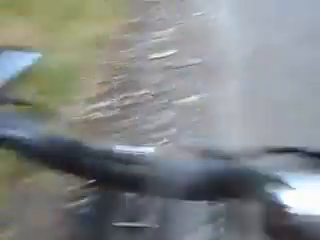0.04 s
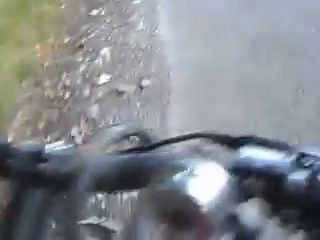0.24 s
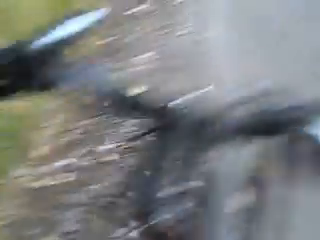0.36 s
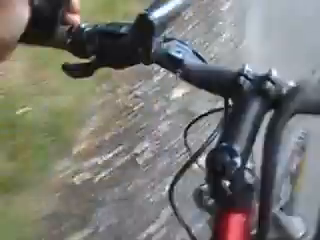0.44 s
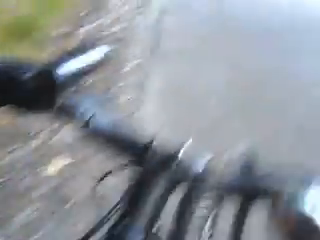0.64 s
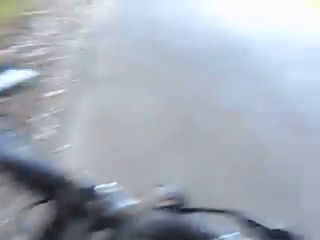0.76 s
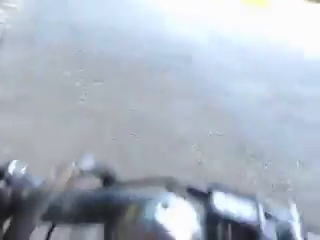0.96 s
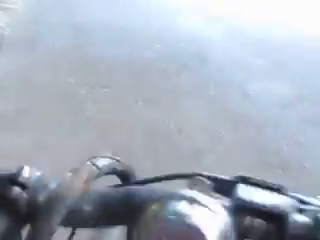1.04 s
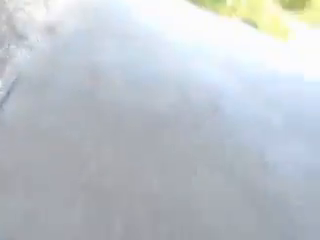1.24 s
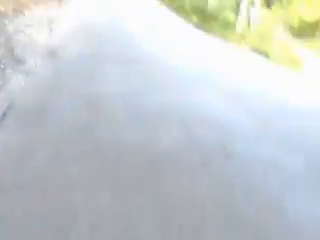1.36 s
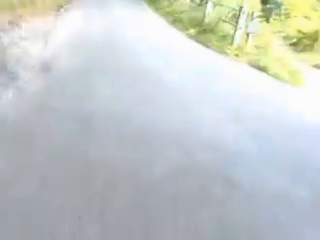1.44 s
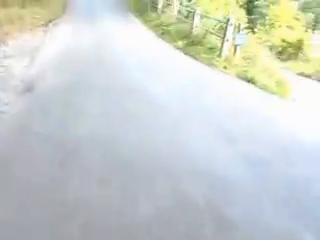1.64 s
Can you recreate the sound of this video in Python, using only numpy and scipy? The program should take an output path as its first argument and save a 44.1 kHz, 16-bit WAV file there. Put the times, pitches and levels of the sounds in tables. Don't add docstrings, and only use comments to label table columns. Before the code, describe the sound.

Close to the handlebars outdoors, stones click and grit crunches under bicycle tyres; a thrown stone raps the frame early and rattles, more crunching follows, then it thins to quiet road hiss with a few dull taps.

```python
import sys
import numpy as np
from scipy import signal
from scipy.fft import rfft, irfft
from scipy.io import wavfile
from scipy.ndimage import uniform_filter1d

SR = 44100
rng = np.random.default_rng(int(sys.argv[2]) if len(sys.argv) > 2 else 0)


def file_out(sig):
    cols = np.atleast_2d(sig).T
    lim = np.clip(cols, -1, 1)
    pcm = np.round(lim * 32767).astype(np.int16)
    wavfile.write(sys.argv[1], SR, pcm)


def attenuation_scalar(level_db):
    decades = np.asarray(level_db, float) / 20
    return 10 ** decades


N = 74970
t = np.arange(N) / SR

# start in seconds, peak level in dB, pitch in Hz, time for the tail to fall 60 dB in seconds,
# length of the click in cycles.
STONE_SNAPS = [(0.0160, -32, 2825, 0.045, 2.5), (0.0232, -31.5, 2250, 0.04, 0.99),
               (.0418, -38, 2000, .02, 2.4), (.1300, -21.5, 2190, 0.022, 1.13),
               (.1597, -36, 1700, 0.027, 1.4), (0.1662, -36.5, 1480, 0.023, 1.4),
               (0.225, -15.5, 3230, 0.029, 1.16), (0.3007, -11.5, 3760, 0.013, 4.5),
               (0.302, -15, 5680, 0.0049, 2.9), (0.516, -28.5, 1930, 0.019, 0.7),
               (0.5764, -34.5, 2720, 0.041, 6), (0.5965, -30, 2470, 0.085, 0.73),
               (0.6553, -35.5, 1860, 0.031, 2.3), (0.6772, -28, 2310, 0.12, 1.8),
               (.6830, -33.5, 2100, 0.071, 3.2), (0.758, -33.5, 3000, 0.034, 0.86),
               (0.8623, -39, 3320, 0.074, 1.2), (0.896, -39, 4550, 0.031, 0.97),
               (0.9523, -38, 4000, 0.15, 1.1), (1.0443, -39, 2580, 0.029, 2.05),
               (1.0528, -47, 2400, 0.027, 1.2), (1.3190, -30.5, 5400, 0.014, 2.6),
               (1.3218, -39.5, 4380, .01, 3.9), (1.3203, -36, 2350, 0.1, 1.4),
               (1.3618, -39.5, 2390, 0.023, 2.5), (1.4042, -37.5, 2160, 0.021, 0.88)]

# start in seconds, length in seconds, rms level in dB, pitch in Hz.
GRIT_PATCHES = [(0.024, 0.007, -49, 3136), (0.046, 0.0132, -50.5, 2880), (0.093, 0.0064, -49, 1450),
                (0.102, 0.011, -56, 1404), (0.111, .007, -53, 3000), (0.243, 0.027, -52.5, 3240),
                (0.319, 0.04, -45.5, 1620), (0.33, 0.051, -52.5, 4920), (0.344, 0.029, -59, 8000),
                (0.364, 0.015, -54.5, 4330), (0.502, 0.0053, -44.5, 1460), (0.509, 0.0056, -50.5, 4980),
                (0.535, 0.018, -49, 1850), (0.539, 0.01, -54.5, 5730), (0.568, 0.0071, -54, 5560),
                (0.57, 0.0065, -49, 1970), (0.575, 0.0067, -48, 3900), (0.571, 0.032, -58, 400),
                (0.597, 0.012, -49, 2000), (0.599, .008, -62, 3700), (0.621, 0.015, -52, 2640),
                (0.651, 0.007, -46.5, 2620), (.651, 0.0082, -52.5, 3940), (0.669, 0.027, -63, 2500),
                (0.858, 0.0168, -60, 3500), (0.894, 0.0033, -53, 1800), (.972, 0.0164, -64, 8500),
                (0.964, 0.033, -58.5, 2800), (1.058, 0.05, -57.5, 2320), (1.356, 0.03, -57.5, 2500),
                (0.188, 0.006, -66, 8750),]

# start in seconds, peak level in dB, pitch in Hz.
GRIT_TICKS = [(0.0515, -43.5, 3350), (0.0594, -38.5, 3000), (0.234, -42, 3740), (0.2349, -40, 1920),
              (0.251, -41, 3156), (0.2614, -44, 4200), (0.2642, -44, 3950), (0.2943, -43, 3420),
              (0.3282, -34, 2580), (0.327, -41, 3740), (0.3277, -40, 2670), (0.3355, -37, 1760),
              (0.3356, -35, 5000), (0.3404, -46, 3000), (0.3416, -48, 4420), (0.3451, -38, 2830),
              (0.346, -43, 4930), (0.3494, -31, 2750), (0.3491, -43, 4690), (0.3526, -50, 2270),
              (0.354, -38, 3000), (0.3578, -41, 1760), (0.3589, -39, 2850), (0.3616, -38.5, 2030),
              (0.3664, -42, 3740), (0.3698, -37, 2830), (0.3755, -39, 3000), (0.3787, -42.5, 4930),
              (0.379, -38, 2830), (0.381, -41, 4420), (0.3802, -47, 3000), (0.3844, -41, 3000),
              (0.4177, -43, 3740), (0.5118, -38, 5440), (0.5374, -43, 2250), (0.5441, -50.5, 5830),
              (0.5503, -44.5, 2850), (0.5535, -45, 2680), (0.567, -43, 5800), (0.5701, -50, 2260),
              (0.5717, -43.5, 5770), (0.5743, -38, 1720), (0.5851, -43, 2400), (0.6049, -41, 3950),
              (0.607, -38, 2670), (0.9771, -46.5, 3000), (1.0392, -48, 2270), (1.0547, -46, 2680),
              (1.077, -46, 2810), (1.1071, -46.5, 4670), (1.3655, -49, 2530), (1.3697, -46, 2830)]

# start in
# seconds, peak level in dB, pitch in Hz, time to fall 60 dB in seconds.
DULL_PINGS = [(.058, -48, 880, 0.04), (.1305, -35.5, 842, 0.0245), (0.227, -42, 1160, 0.017),
              (0.3024, -22.5, 1255, 0.029), (0.2644, -43.5, 1240, .02), (.2992, -21.5, 760, 0.0116),
              (.301, -37, 396, 0.029), (.301, -53, 298.5, 0.3), (0.302, -55, 190, 0.22),
              (.3015, -34.5, 696, 0.051), (.3305, -33, 936, 0.012), (0.361, -43.5, 900, 0.0065),
              (0.792, -49, 1280, 0.026), (0.822, -50, 1300, .02), (0.923, -49, 1026, 0.042),
              (.955, -43.5, 1270, 0.0704), (.962, -38.5, 563, 0.0088), (1.3169, -36, 1110, 0.0078),
              (1.3206, -32.5, 1130, 0.013), (1.3238, -44, 513, 0.027), (1.329, -44, 656, 0.057),
              (1.4499, -38, 1150, 0.0098), (1.458, -40, 1010, 0.015), (1.5105, -43.5, 982, 0.014),
              (1.547, -49.5, 990, 0.025), (1.586, -44.5, 900, 0.036), (1.514, -44.5, 980, .015)]

# start in seconds, level in dB, favoured pitch in Hz.
FRAME_HITS = [(.3010, -28, 7900), (.3016, -24, 3640), (.3033, -24.5, 5830), (.3037, -19.5, 1700),
              (.3058, -50, 1720), (.3068, -22.5, 3300), (.309, -31, 3280), (.3119, -22.5, 3300),
              (.3118, -32, 7040), (.3146, -28, 3370), (.3198, -32, 1800), (.322, -40, 3320)]

# pitch in Hz, level in dB, time to fall 60 dB in seconds.
FRAME_MODES = [(680, -10, 0.035), (1255, 3, 0.02), (1770, 5, 0.035), (2517, -22, 0.057), (3000, 0, 0.061),
               (3397, 5.5, 0.0276), (3574, -1.5, 0.054), (3740, 7, 0.0067), (4097, -4, 0.063),
               (4983, -10, 0.021), (5500, 1.5, 0.023), (6520, -7.5, 0.02), (6930, -5.5, 0.036),
               (7810, 1, 0.021)]

# pitch in Hz, width in Hz, level in dB,
# start in seconds, length in seconds.
SPOKE_RINGS = [
    (2030, 16, -49, .338, 0.018),
    (2470, 50, -49.5, .338, 0.012),
    (2875, 18, -49.5, .372, 0.03),
    (3000, 35, -58, .34, 0.0094),
    (4780, 80, -59.5, 0.37, 0.024),
    (8270, 240, -57.5, 0.31, 0.047),
]

# time in seconds, level in dB.
ROLLING_LOAD = [(0, -46.5), (.12, -48.5), (.2, -46), (.28, -44), (.36, -44), (.42, -46), (.49, -48),
                (.56, -44), (.64, -48), (.72, -51), (.84, -59), (.94, -51.5), (1.0, -52.5), (1.1, -52.5),
                (1.2, -55), (1.38, -55.5), (1.7, -61)]

# frequency in Hz, level in dB per Hz.
GRIT_TONE = [(120, -45), (200, -17), (279, -30), (415, -5.5), (904, -0.5), (2440, -1), (10500, -20),
             (13600, -34), (22000, -120)]

# frequency in Hz, level in dB per Hz.
HISS_TONE = [(15, -40), (25, -36), (298, -2), (435, -4.5), (481, -3), (1110, -2), (1750, -1.5),
             (5870, -12.5), (10500, -33.5), (13600, -35), (22000, -120)]


def unit(x):
    return x / np.sqrt(np.mean(x ** 2) + 1e-30)


def band(x, hz, width):
    return signal.lfilter(*signal.iirpeak(min(hz, 15000), hz / max(width, 5), fs=SR), x)


def colour(x, tone):
    f = np.fft.rfftfreq(len(x), 1 / SR) + 1
    hz, db = np.transpose(tone)
    gain = attenuation_scalar(np.interp(np.log(f), np.log(hz), db))
    return irfft(rfft(x) * gain, len(x))


def walk(rate):
    k = int(SR / rate)
    steps = np.repeat(rng.standard_normal(N // k + 1), k)
    return 0.74 * uniform_filter1d(uniform_filter1d(steps, k), k)[:N]


def fade(u, t60):
    return (u >= 0) * np.exp(-np.log(1000) * np.maximum(u, 0) / max(t60, 1e-3))


def bell(mid, hz, cycles):
    return np.exp(-(mid * hz / cycles * 2) ** 2) * np.cos(2 * np.pi * hz * mid)


def grains(count, per_s, spread_db):
    chance, side, size = rng.random((count, 3)).T
    return (chance < per_s / SR) * np.sign(side - .5) * attenuation_scalar(-spread_db * np.log(size + .03))


def add(out, s, make, size=6000):
    i = max(int(s * SR) - 64, 0)
    u = t[i:i + size] - s
    out[i:i + size] += make(u)


def stone_snaps():
    out = np.zeros(N)
    for s, db, hz, t60, cycles in STONE_SNAPS:
        noise = rng.standard_normal(6000)

        def make(u):
            n = noise[:len(u)]
            mid = u - 0.001254
            edge = attenuation_scalar(-35) * unit(band(n, 5300, 6000)) * fade(mid, 0.0037)
            fragments = unit(band(band(n[::-1], hz, 1.13 * hz), 0.64 * hz, 0.87 * hz))
            tail = attenuation_scalar(-15.5) * fragments * fade(mid - 0.0013 / 2, t60)
            return attenuation_scalar(db) * (bell(mid, hz, cycles) + edge + tail)
        add(out, s, make)
    return out


def grit_crunch():
    out = np.zeros(N)
    for s, dur, db, hz in GRIT_PATCHES:
        reach = min(.24, (1700 / hz) ** 1.6) * 1.6
        octaves = np.linspace(-1, 1, 5) * reach + .04 * rng.standard_normal(5)
        g = 0
        for f in hz * 2 ** octaves:
            rough = band(grains(6000, 2000, 4.0), f, f / 2)
            g = g + band(rough, f, min(f / 8, 600))
        g = g[300:]
        g = g / np.std(g[64:64 + int(1.3 * dur * SR)])

        def make(u):
            rise = np.clip(u / .002, 0, 1)
            fall = np.clip((dur - u) / (.35 * dur) + 1, 0, 1)
            return attenuation_scalar(db) * g[:len(u)] * rise * fall
        add(out, s, make, size=5000)
    return out


def grit_ticks():
    out = np.zeros(N)
    for s, db, hz in GRIT_TICKS:
        add(out, s - .004, lambda u: attenuation_scalar(db) * bell(u - .004, hz, 4.7), size=500)
    return out


def dull_pings():
    out = np.zeros(N)
    for s, db, hz, t60 in DULL_PINGS:
        noise = rng.standard_normal(6000)
        scrape = attenuation_scalar(-3.5) * unit(band(band(noise, hz, hz / 2), hz, hz / 2))

        def make(u):
            soft_start = np.clip(u / .0008, 0, 1)
            return attenuation_scalar(db) * (np.sin(2 * np.pi * hz * u) + scrape[:len(u)]) * fade(u, t60) * soft_start
        add(out, s, make)
    return out


def frame_knock():
    out = np.zeros(N)
    hz, gain_db, t60 = np.transpose(FRAME_MODES)
    for k, (s, db, near) in enumerate(FRAME_HITS):
        noise = rng.standard_normal(6000)
        signs = (-1.) ** (np.arange(len(hz)) + k)
        favour = np.exp(-(np.log2(hz / near) / 0.63) ** 2)
        g = signs * attenuation_scalar(gain_db) * favour
        g = g / np.sqrt(np.sum(g ** 2))

        def make(u):
            modes = sum(a * np.sin(2 * np.pi * f * u) * fade(u, d) for a, f, d in zip(g, hz, t60))
            hiss = unit(band(band(noise[:len(u)], near, 0.82 * near), near, 0.82 * near))
            return attenuation_scalar(db) * (modes + attenuation_scalar(-5.5) * hiss * fade(u, 0.014))
        add(out, s, make)
    return out


def spoke_rings():
    out = np.zeros(N)
    for f, width, db, s, dur in SPOKE_RINGS:
        push = grains(N, 6000, 1.5) * fade(t - s, 4 * dur) * (t < s + dur)
        damping = attenuation_scalar(-900 * np.maximum(t - s - dur, 0))
        ring = band(push, f, width) * damping
        out += attenuation_scalar(db) * unit(ring) * np.sqrt(dur * SR / N)
    return out


def rolling_grit(load):
    shared = 4.8 * walk(40.22)
    grit = 0
    for hz in 350 * 2 ** np.arange(0, 5, .35):
        ring = unit(band(grains(N, 700, 2), hz, hz / 3.6))
        grit = grit + ring * np.sqrt(hz) * attenuation_scalar(4.9 * walk(69.5) + shared)
    return unit(colour(grit, GRIT_TONE)) * attenuation_scalar(load - 5)


def tyre_hiss(load):
    level_db = -56.5 + 0.084 * (load - load.min()) + 0.67 * walk(15.0)
    return unit(colour(rng.standard_normal(N), HISS_TONE)) * attenuation_scalar(level_db)


def wind():
    return unit(band(rng.standard_normal(N), 45, 110)) * attenuation_scalar(-81 + 3.5 * walk(14))


def scene():
    hits = stone_snaps() + grit_crunch() + grit_ticks() + dull_pings() + frame_knock() + spoke_rings()
    no_bass = signal.butter(4, 190, "high", fs=SR, output="sos")
    load = np.interp(t, *np.transpose(ROLLING_LOAD))
    background = rolling_grit(load) + tyre_hiss(load) + wind()
    return (background + signal.sosfilt(no_bass, hits))[None]


def band_limit(x):
    return signal.sosfilt(signal.butter(12, 10840, fs=SR, output="sos"), x)


def record(dry):
    ceiling, top_hz, self_noise_db = 1.1, 11150, -99
    rounded = ceiling * np.tanh(dry / ceiling)
    top_cut = signal.cheby2(10, 60, top_hz + 500, fs=SR, output="sos")
    x = signal.sosfilt(top_cut, rounded)
    mix = x + attenuation_scalar(self_noise_db) * rng.standard_normal(dry.shape)
    return band_limit(mix)


dry = scene()
out = record(dry)
file_out(out)
```